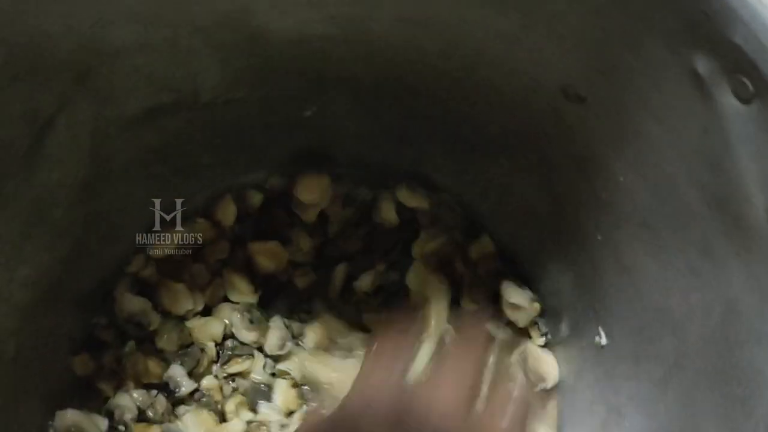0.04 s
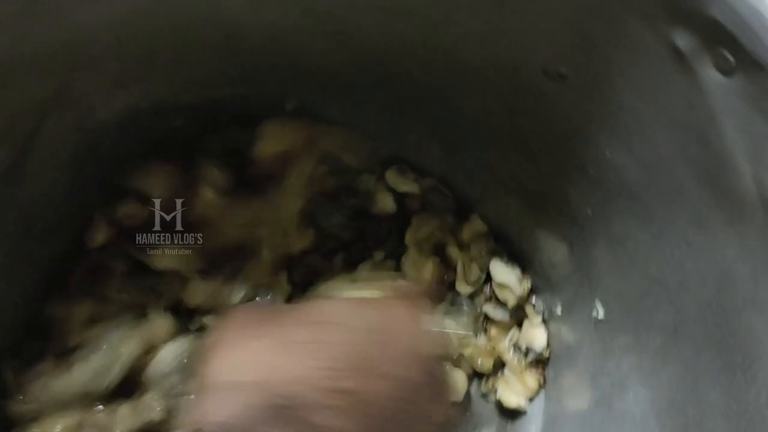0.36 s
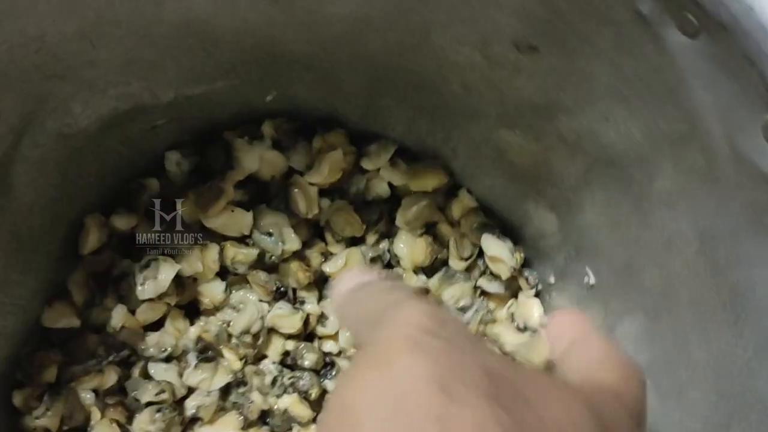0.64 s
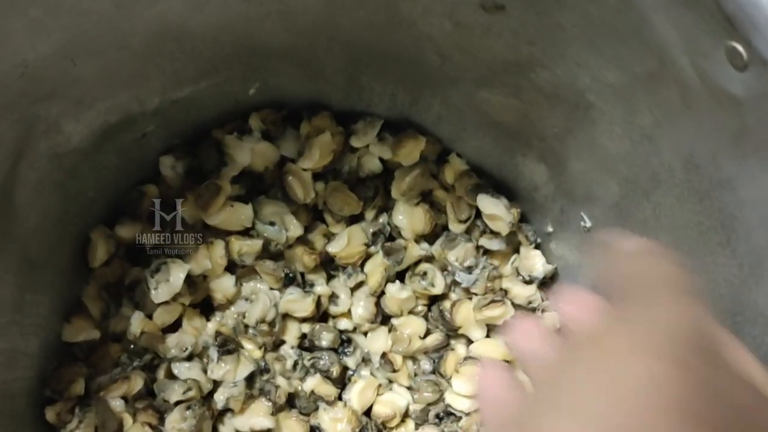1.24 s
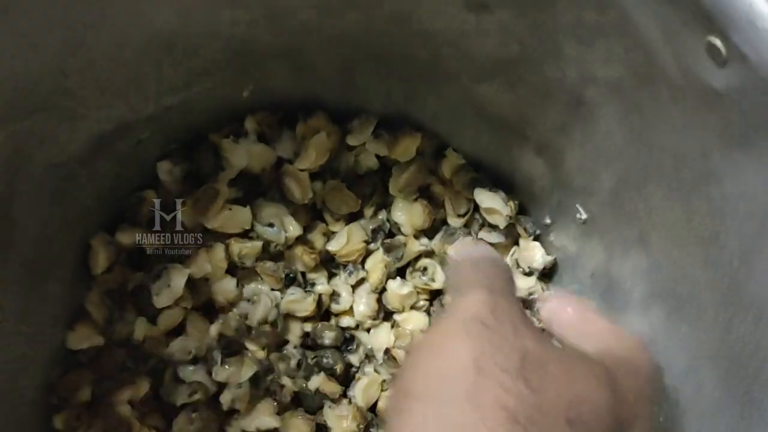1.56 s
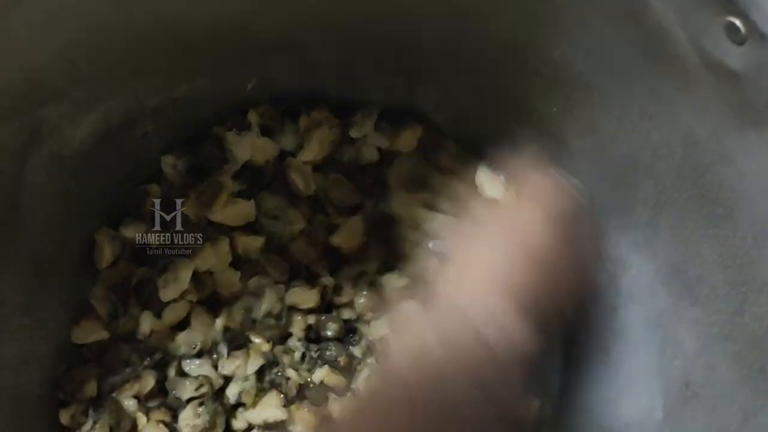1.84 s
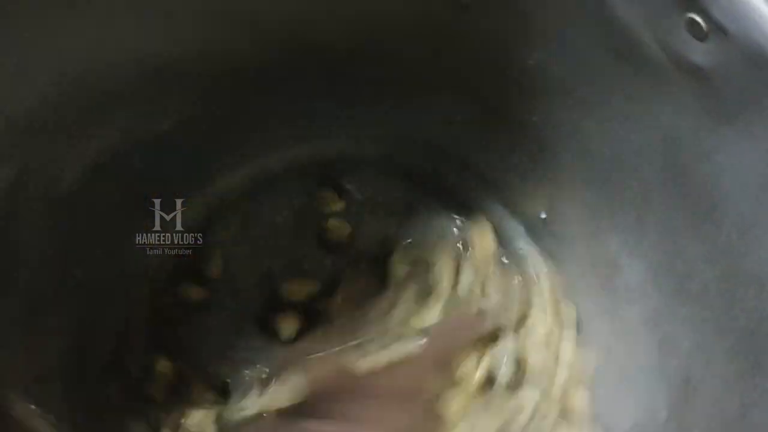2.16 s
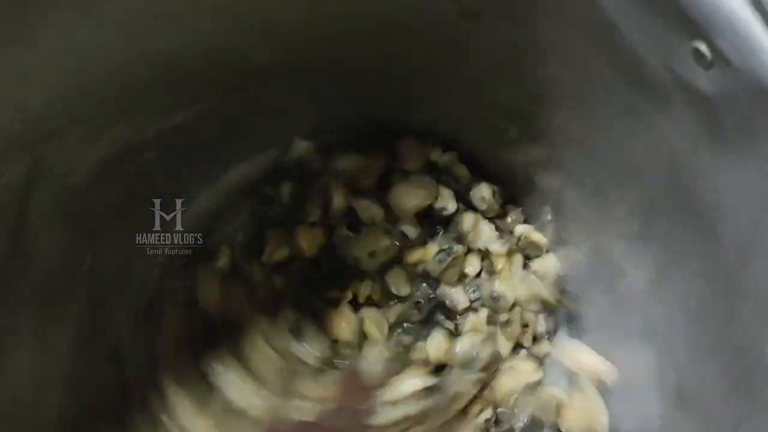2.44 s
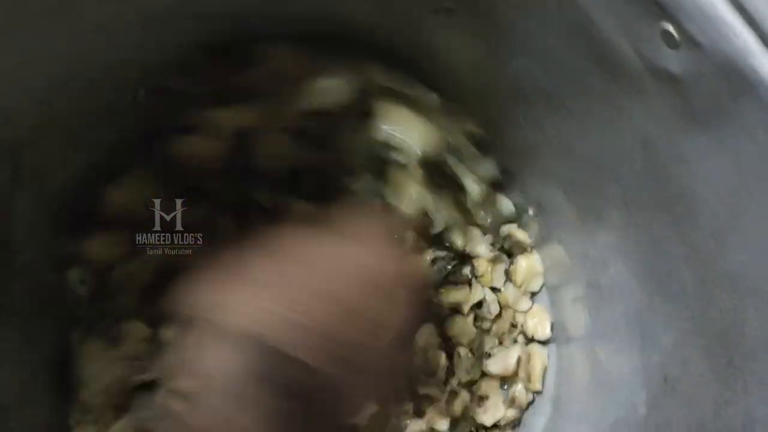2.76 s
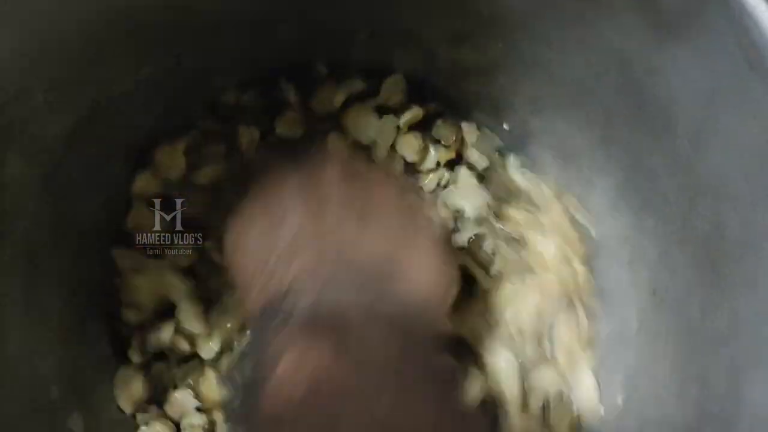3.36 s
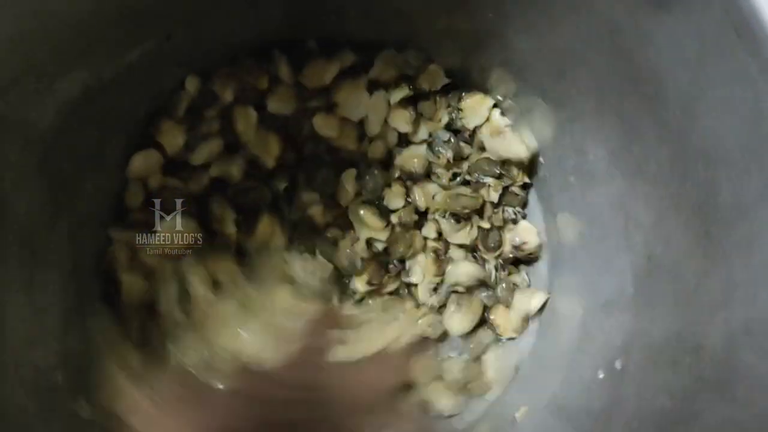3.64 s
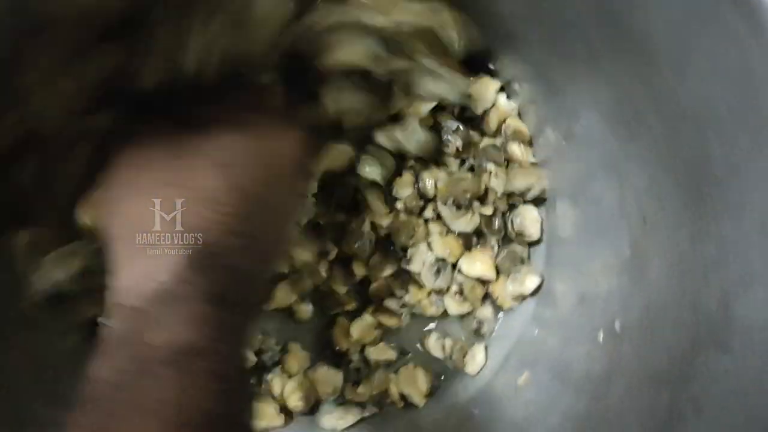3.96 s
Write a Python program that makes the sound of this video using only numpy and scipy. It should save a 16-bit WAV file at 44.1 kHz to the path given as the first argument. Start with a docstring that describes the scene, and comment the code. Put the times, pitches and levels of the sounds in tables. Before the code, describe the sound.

A hand swishes wet snail pieces around a metal pot while a cricket chirps.

```python
"""Small wet snails stirred by hand in a metal pot, outdoors, close to the microphone.
They crackle against each other, scrape the wall and bump the bottom; now and then the pot is
knocked and rings. Off to the left a bush cricket rasps its wings in quick chirps.
Behind it all lie a dull hum and a far chorus of insects."""
import sys
import numpy as np
from scipy import signal
from scipy.fft import rfft, irfft, next_fast_len
from scipy.io import wavfile
from scipy.ndimage import map_coordinates

SR = 44100
rng = np.random.default_rng(int(sys.argv[2]) if len(sys.argv) > 2 else 0)


def int16_out(signal):
    """Quantize to a 16-bit WAV file."""
    q = np.round(np.clip(np.atleast_2d(signal).T, -1, 1) * 32767)
    wavfile.write(sys.argv[1], SR, q.astype(np.int16))


N = 176400

GRAINS_PER_S, SCRAPES_PER_S = 4400, 1600
# shell rubbing on shell, close up (t/s, level/dB)
RUSTLE_LEVEL = [(0, -36), (.14, -50.5), (.235, -33), (.33, -33), (.43, -42), (.62, -52), (1.78, -54),
                (1.9, -44), (2.0, -31), (2.15, -30), (2.33, -35.5), (2.6, -33), (2.82, -39), (3.04, -48),
                (3.22, -30.5), (3.42, -30), (3.58, -42), (3.69, -39), (3.75, -30), (3.86, -33), (4, -44)]
# spectrum of the shells (f/Hz, level/dB)
SHELL_SPECTRUM = [(600, -13), (1500, -13.5), (3000, -1.5), (4500, -5), (6000, -6), (8000, -0.5),
                  (10000, -9), (15500, -12)]
def rustle():
    """Wet shells crackle against each other in clumps, right at the microphone."""
    grains = contacts(GRAINS_PER_S, size_db=3.5, echo=1.8, t60=.04)
    clumps_db = 1.3 * wobble(60)
    return shaped(grains, SHELL_SPECTRUM) * amp(curve(RUSTLE_LEVEL) + clumps_db)


# bright hisses: first the hand rubbing over the shells, then the whole heap sliding (start t/s, end t/s,
# level/dB)
BRIGHT_HISSES = [(1.104, 1.38, -48), (3.696, 3.896, -29)]
# spectrum of their hiss (f/Hz, level/dB)
HISS_SPECTRUM = [(2500, -42), (5000, 5), (10000, 4.5), (14000, 2.5)]
def swishes():
    """When the hand rubs over the shells, or the whole heap slides at once, it hisses brightly."""
    t, level = np.arange(N) / SR, np.zeros(N)
    for start, end, db in BRIGHT_HISSES:
        progress = np.clip((t - start) / (end - start), 0, 1)
        level += amp(db) * np.sqrt(np.maximum(np.sin(np.pi * progress), 0))
    return shaped(contacts(GRAINS_PER_S, size_db=.5, echo=2, t60=.03), HISS_SPECTRUM) * level


# shells dragging along the metal (t/s, level/dB)
SCRAPE_LEVEL = [(0, -32.5), (.13, -46.5), (.2, -35.5), (.35, -35), (.5, -42.5), (.65, -57.5), (1.7, -58.5),
                (1.87, -39.5), (2.02, -32), (2.7, -32), (2.9, -52.5), (3.14, -29), (3.26, -33.5),
                (3.56, -46), (3.68, -42), (3.82, -31.5), (4, -39)]
# spectrum of that friction (f/Hz, level/dB)
SCRAPE_SPECTRUM = [(50, -28), (110, -10), (190, -6.5), (270, 12.5), (420, -4), (850, 0), (2200, -8),
                   (5000, -17.5), (9000, -54)]
# modes of the pot's wall (f/Hz, level/dB, t60/s)
WALL_MODES = [(269.8, -4.5, 0.15), (380, -7, 0.049), (496, -13, 0.33), (707.3, -6.5, 0.2),
              (792, -8.5, 0.18), (850, 2.5, 0.08), (877, -6, 0.13), (984, -13, 0.16), (1167, -3.5, 0.095),
              (1404, 0.5, 0.033), (1595, -8, 0.045), (2176, 0, 0.032)]
def scrape():
    """Shells catch and slip on the metal and stir its modes, which wander as the load shifts."""
    slips = contacts(SCRAPES_PER_S, size_db=1.5, echo=2.6, t60=.037) * amp(2.3 * wobble(45))
    metal, step = np.zeros((2, N)), SR // 10
    for i in range(0, N, step):
        wall = ring(WALL_MODES, scatter_db=2, pitch=1 + .03 * rng.normal())
        add(metal, i / SR, signal.fftconvolve(slips[:, i:i + step], wall[None], axes=1))
    return (shaped(slips, SCRAPE_SPECTRUM) + amp(-12) * unit(metal)) * amp(curve(SCRAPE_LEVEL))


JUDDER_HZ, JUDDER_SPREAD = 269.6, .047
# soft bumps and drags on the bottom (t/s, relative level/dB, push length/s)
BOTTOM_BUMPS = [(.18, -28, .24), (0.426, -19.5, 0.042), (0.498, -27, 0.022), (0.599, -28, 0.0062),
                (1.583, -29.5, 0.0044), (1.889, -15, 0.033), (2.214, -17, 0.0099), (2.277, -12.5, 0.013),
                (2.325, -14.5, 0.0092), (2.348, -18, 0.055), (2.432, -11.5, 0.026), (2.6158, -5, 0.004),
                (2.911, -21, 0.0037), (2.977, -22.5, 0.011), (3.201, -17, 0.02), (3.262, -25, 0.0095),
                (3.631, -9.5, 0.017)]
# modes of the loaded bottom (f/Hz, level/dB, t60/s)
BOTTOM_MODES = [(272.4, 2.5, 0.092), (312, 5.5, 0.0464)]
def bumps():
    """The shoved heap judders near the bottom's own pitch and makes it boom, right of centre."""
    out, t = np.zeros(N), np.arange(SR // 4) / SR
    for s, db, length in BOTTOM_BUMPS:
        drift = np.cumsum(rng.normal(0, .035, len(t)))
        hz = JUDDER_HZ * (1 + JUDDER_SPREAD * rng.normal())
        judder = np.cos(2 * np.pi * hz * t + drift) + 2 * rng.standard_normal(len(t))
        force = judder * np.sin(np.pi * np.minimum(t / length, 1))
        boom = signal.fftconvolve(force, ring(BOTTOM_MODES, scatter_db=1))
        add(out, s, amp(db - 3) * boom / np.abs(boom).max())
    return out * pan(-6.5)


# blows on the wall (t/s, relative level/dB, brightness f/Hz, contact length/s, pitch ratio under load)
WALL_KNOCKS = [(0.0301, -.5, 4170, 0.0032, .99), (.44, -15.5, 740, 0.042, 0.85),
               (.899, -22.5, 4500, 0.0015, 0.81), (1.883, -6.5, 800, 0.045, 0.96),
               (2.833, -19, 726, 0.0042, 0.93), (2.966, 4, 780, 0.013, .99),
               (2.981, 2.5, 1230, 0.00453, .99), (3.632, -3, 620, 0.0072, 1.1)]
# spectrum of the pot's hollow (f/Hz, level/dB)
HOLLOW_SPECTRUM = [(150, -15), (400, 11), (900, 5.5), (1600, 7.5), (2800, 5), (4300, 0.5), (7000, -35)]
def knocks():
    """A blow rings the wall and the hollow; hard blows are thin, soft ones dull, drawn-out ones scuff."""
    out = np.zeros((2, N))
    for s, db, bright_hz, length, pitch in WALL_KNOCKS:
        wall = np.array([ring(WALL_MODES, .79, pitch), ring(WALL_MODES, 1, pitch)])
        metal = signal.fftconvolve(wall, np.array([push(length), push(length)]), axes=1)
        metal /= np.linalg.norm(metal, axis=1, keepdims=True)
        add(metal, length / 4, .0071 * shaped(burst(t60=.11), HOLLOW_SPECTRUM))
        low_hz = .092 * bright_hz + 100
        blow = colour(metal, lambda f: f ** 2 / (f ** 2 + low_hz ** 2) / np.sqrt(1 + (f / bright_hz) ** 5))
        add(out, s, amp(db + 15) * blow)
    return out


def push(length):
    """The force of a contact, at energy 1: a clean tap when short, a rough swell when long."""
    progress = np.arange(SR // 12) / SR / length
    swell = rng.standard_normal(len(progress)) * np.sin(np.pi * np.minimum(progress, 1))
    tap = (progress == 0) * (.0035 / length) ** 2
    force = swell / np.linalg.norm(swell) + tap
    return force / np.linalg.norm(force)


RATTLES_PER_S, RATTLE_HZ, SNAP_Q = 45, 3000, 3.1
# single shells striking the metal (t/s, relative level/dB, f/Hz, left over right/dB)
SHELL_SNAPS = [(0.03, -12, 6100, -1), (1.584, -24.5, 1660, -3), (1.9223, -24, 5930, -5),
               (2.277, -24.5, 5100, -10), (2.375, -21.5, 7100, 15), (2.522, -27, 4100, -2),
               (3.244, -18, 1280, 0)]
def snaps():
    """Single shells click: a few loud snaps, and a loose random rattle that follows the stirring."""
    out, stir_db, rattle = np.zeros((2, N)), curve(RUSTLE_LEVEL), []
    for i in rng.integers(N, size=RATTLES_PER_S * N // SR):
        db = stir_db[i] + 4 + 2 * rng.normal()
        rattle.append((i / SR, db, RATTLE_HZ * 2 ** rng.uniform(-1, 1), rng.uniform(-6, 6)))
    for s, db, hz, side_db in SHELL_SNAPS + rattle:
        add(out, s, amp(db - 16.5) * pan(side_db) * click(hz))
    return out


def click(hz):
    """One hard little click with a short resonance."""
    impact = burst(t60=.044)[:, :SR // 20]
    return unit(colour(impact, lambda f: 1 / np.hypot(1, SNAP_Q * (f / hz - hz / (f + 1)))))


END_TOOTH_HZ, TOOTH_SCATTER = 398.5, .39  # a stroke starts at twice this tooth rate
CHIRP_FLOOR, FADE_S, CRICKET_PAN_DB = .66, .14, 15.5
RASP_CENTRE_HZ, RASP_SLIDE = 7250, .25  # each chirp tips from above the centre to below, by this share
# the cricket's phrases (start t/s, end t/s, chirp period/s, relative level/dB)
CRICKET_PHRASES = [(-.053, 2.85, .0618, -40.5), (2.832, 4.0, .0612, -40)]
# spectrum of its wings (f/Hz, level/dB)
WING_SPECTRUM = [(4500, -63), (5700, -33), (6300, -5), (6900, 8.5), (7850, 4.5), (8200, -6.5), (9100, -40),
                 (15000, -20)]
def cricket():
    """Off to the left, each wing stroke is a swelling run of tooth clicks that slows and falls in pitch."""
    t, level, speed = np.arange(N) / SR, np.zeros(N), np.ones(N)
    for start, end, period, db in CRICKET_PHRASES:
        phase = (t - start) / period % 1
        fade = np.clip((end - t) / FADE_S, 0, 1) ** 2
        level += amp(db) * (CHIRP_FLOOR + np.sin(np.pi * phase)) * (t > start) * fade
        speed = np.where(t > start, 2 - phase, speed)
    teeth_passed = np.cumsum(END_TOOTH_HZ * speed * np.exp(TOOTH_SCATTER * wobble(END_TOOTH_HZ))) / SR
    teeth = np.diff(np.floor(teeth_passed), prepend=0) * amp(2 * rng.standard_normal(N))
    echoes = signal.fftconvolve(teeth[None], burst(t60=.19), axes=1)[:, :N]
    rasp = shaped(teeth + np.array([[.55], [1.6]]) * echoes, WING_SPECTRUM)  # more echo on the right
    high_minus_low = irfft(rfft(rasp) * np.sign(np.fft.rfftfreq(N, 1 / SR) - RASP_CENTRE_HZ), N)
    return (rasp + RASP_SLIDE * np.cos(np.pi * speed) * high_minus_low) * level * pan(CRICKET_PAN_DB)


HUM_DB = -45.5
# spectrum of the outdoor hum (f/Hz, level/dB)
HUM_SPECTRUM = [(45, -1), (115, 6), (250, 0.5), (1100, -18), (1600, -3), (2200, -14.5), (9500, -52)]
def hum():
    """The open air around the pot: a dull noise that wavers slightly."""
    air = shaped(rng.standard_normal((2, N)), HUM_SPECTRUM)
    return spread(air, lean=[(1, 0)]) * amp(HUM_DB + wobble(5.53))


CHORUS_DB, CHORUS_PAN_DB = -45, 7
# spectrum of the distant insects (f/Hz, level/dB)
CHORUS_SPECTRUM = [(1200, -37), (2300, -15.5), (2800, -11), (3150, -5), (3550, -10), (6000, -56)]
def far_insects():
    """Far off and left of centre, many insects blur into one flickering band of noise."""
    swell_db = 1.2 * wobble(14)
    chorus = shaped(rng.standard_normal((2, N)), CHORUS_SPECTRUM)
    return chorus * amp(CHORUS_DB + swell_db) * pan(CHORUS_PAN_DB)


def amp(db):
    """Decibels to gain."""
    return 10 ** (np.asarray(db) / 20)


def unit(x):
    """Scale to rms 1."""
    return x / np.sqrt(np.mean(x ** 2) + 1e-20)


def along(points, hz):
    """Read (f/Hz, value) points on a log axis."""
    f, v = np.transpose(points)
    return np.interp(np.log(hz + 1), np.log(f + 1), v)


def curve(rows):
    """One value per sample from (t/s, value) rows."""
    return np.interp(np.arange(N) / SR, *np.transpose(rows))


def wobble(rate):
    """A smooth random curve, rate knots a second."""
    return map_coordinates(rng.standard_normal(2000), [np.arange(N) * rate / SR], mode="wrap")


def pan(db):
    """Channel gains, the left louder by db."""
    return amp(np.array([[.5], [-.5]]) * db)


def colour(x, gain):
    """Minimum-phase filter with the given gain against frequency."""
    m = 2 * next_fast_len(x.shape[-1] // 2 + 4096)
    cepstrum = irfft(np.log(np.maximum(gain(np.fft.rfftfreq(m, 1 / SR)), 1e-6)), m)
    cepstrum[1:m // 2] *= 2
    cepstrum[m // 2 + 1:] = 0
    return irfft(rfft(x, m) * np.exp(rfft(cepstrum)), m)[..., :x.shape[-1]]


def shaped(x, spectrum):
    """x through a spectrum of (f/Hz, level/dB) points, at rms 1."""
    return unit(colour(x, lambda hz: amp(along(spectrum, hz))))


def add(track, s, sound):
    """Mix a sound in at s seconds."""
    i = max(round(s * SR), 0)
    track[..., i:i + sound.shape[-1]] += sound[..., :N - i]


def burst(t60):
    """Dense reflections: two channels of dying noise with energy 1."""
    t = np.arange(SR // 4) / SR
    x = rng.standard_normal((2, len(t))) * amp(-60 * t / t60)
    return x / np.linalg.norm(x, axis=1, keepdims=True)


def ring(modes, scatter_db, pitch=1):
    """Damped modes, each struck a little differently."""
    t = np.arange(SR // 3) / SR
    return sum(amp(db + scatter_db * rng.normal() - 60 * t / t60) * np.sin(2 * np.pi * pitch * hz * t)
               for hz, db, t60 in modes)


def contacts(rate, size_db, echo, t60):
    """Random tiny impacts of uneven size, each with its own wash of reflections."""
    hits = (rng.random(N) < rate / SR) * amp(size_db * np.minimum(rng.exponential(size=N), 4))
    fall = amp(-120 / (t60 * SR))  # energy kept per sample
    wash = np.sqrt(signal.lfilter([1 - fall], [1, -fall], hits ** 2))
    return unit((hits + echo * wash) * rng.standard_normal((2, N)))


# likeness of the microphone's two channels (f/Hz, correlation)
CHANNEL_LIKENESS = [(150, 0.84), (380, 0.85), (950, 0.18), (2400, 0)]
def spread(pair, lean):
    """Two unrelated signals to stereo: alike in the bass, apart in the treble."""
    hz = np.fft.rfftfreq(N, 1 / SR)
    turn = np.arccos(np.clip(along(CHANNEL_LIKENESS, hz), -1, 1)) / 2
    mid, side = rfft(pair) * [np.cos(turn), np.sin(turn)]
    return irfft(np.array([mid + side, mid - side]) * pan(along(lean, hz)), N)


# balance of the pot at the microphone (f/Hz, left over right/dB)
POT_BALANCE = [(100, -1.5), (250, -5), (400, -3), (700, 1.5), (4400, 1.5), (8000, -3), (15000, 4)]
def scene():
    """The pot close in front, the insects around it."""
    pot = spread(rustle() + swishes() + scrape() + knocks(), POT_BALANCE) + bumps() + snaps()
    return pot + cricket() + hum() + far_insects()


LOW_CUT_HZ, TOP_HZ = 97, 15650
def record(dry):
    """The microphone sheds the deep bass and keeps nothing above its band limit."""
    m = next_fast_len(N + SR // 4)
    thin = signal.sosfilt(signal.butter(3, LOW_CUT_HZ, "high", fs=SR, output="sos"), dry)
    return irfft(rfft(thin, m) * (np.fft.rfftfreq(m, 1 / SR) < TOP_HZ), m)[:, :N]


dry = scene()
out = record(dry)
int16_out(out)
```